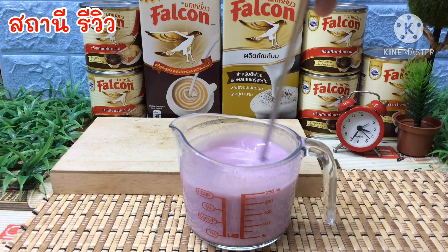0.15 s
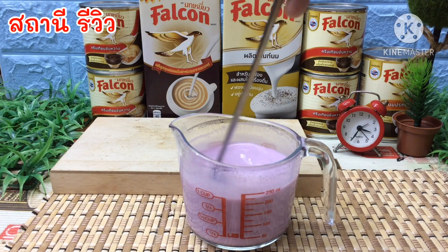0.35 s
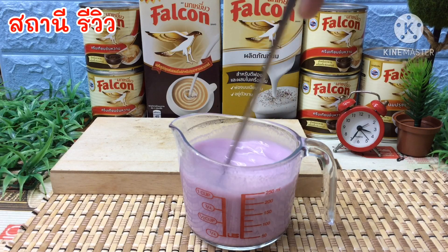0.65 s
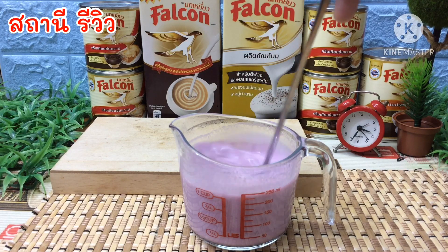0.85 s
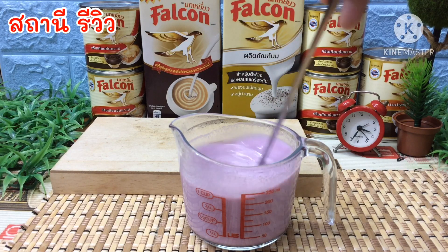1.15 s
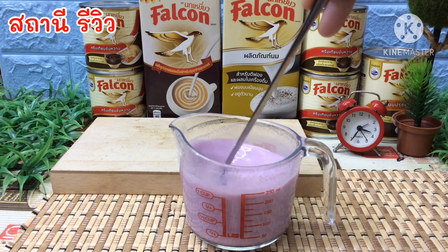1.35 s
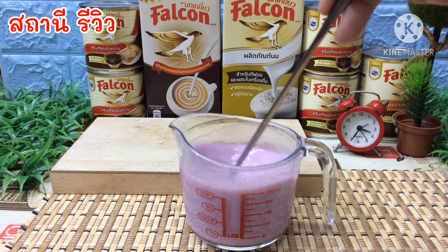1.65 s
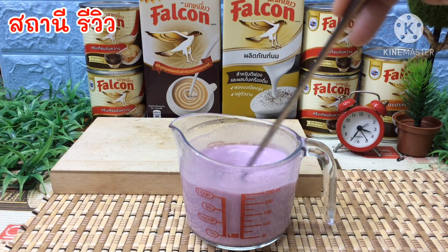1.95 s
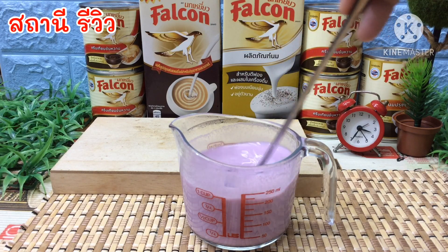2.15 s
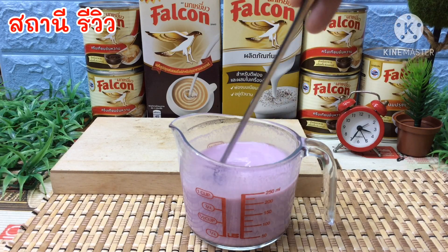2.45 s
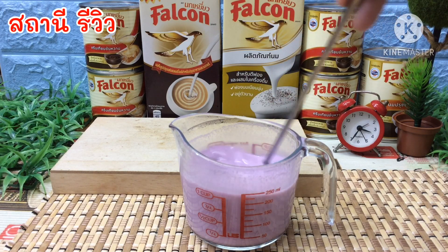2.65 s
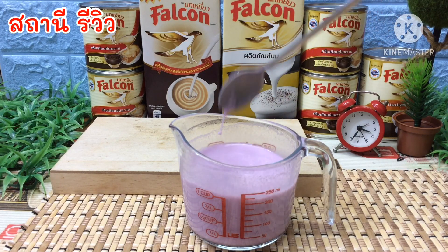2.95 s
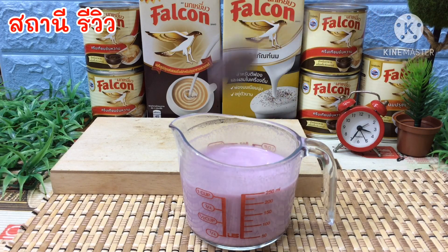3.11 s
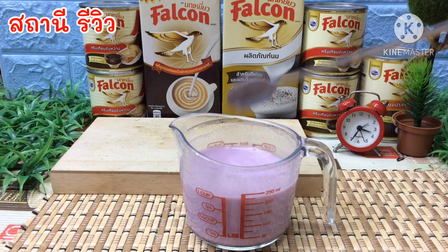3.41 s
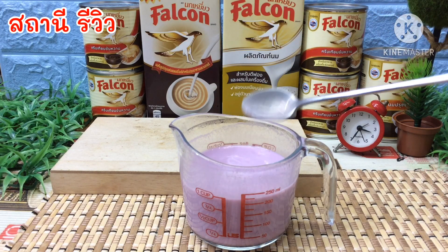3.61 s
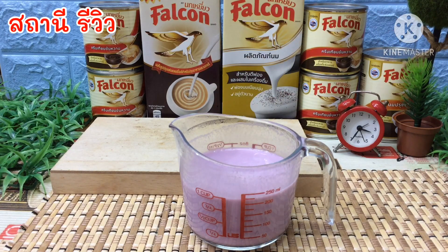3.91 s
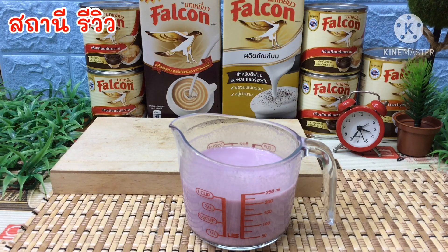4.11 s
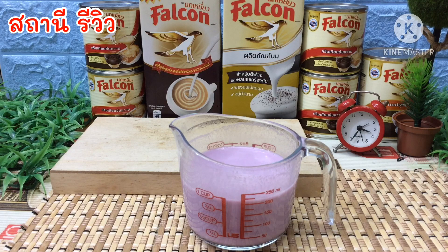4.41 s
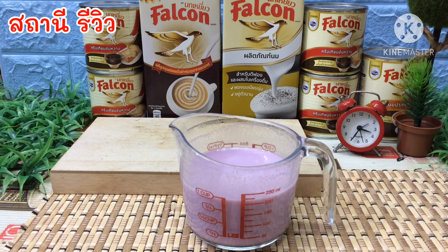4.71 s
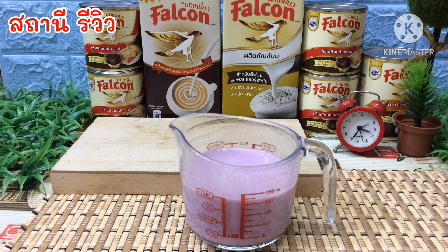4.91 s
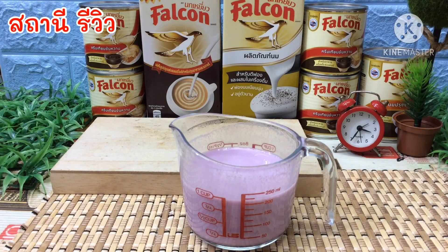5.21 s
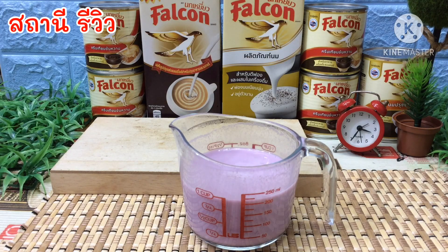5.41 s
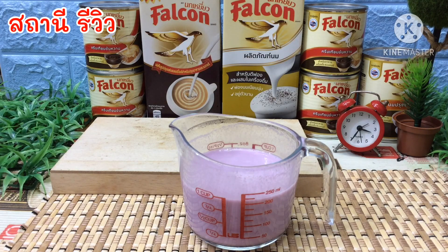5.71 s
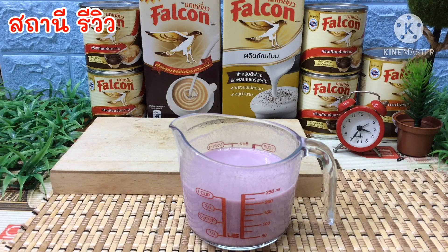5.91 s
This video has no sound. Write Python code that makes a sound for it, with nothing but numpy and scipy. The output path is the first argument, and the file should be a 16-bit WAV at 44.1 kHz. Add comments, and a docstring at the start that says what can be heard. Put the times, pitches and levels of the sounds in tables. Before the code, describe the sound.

From the start, a steel spoon stirs a thick drink in a glass jug close to the microphone, circling about three times a second. Each turn gives a gritty rub that rises and falls in pitch, and bright, briefly ringing clinks come thickly until about 1.1 seconds. The stirring then turns much softer, with light touches and tiny bubble pops. A few clearer clinks return around 2.4 seconds, and the stirring ends by 2.8. A very faint, dull slide follows around 3.4 seconds. At 4.7 seconds something is put down with a hard knock, the loudest sound, briefly ringing the woody counter. Things shift softly, and a second, lighter knock lands at 5.5 seconds, with a few faint drips and ticks up to the end at about 6 seconds. Quiet kitchen hiss, low rumble and electrical hum continue throughout.

```python
"""Stirring a drink in a glass jug

A steel spoon circles a thick jug of milky drink about three times a second, close to the microphone.
Friction and impacts excite the glass wall, whose pitch arches with each turn as the drink loads it.
The spoon is lifted out, things shift softly, and two are put down with hard knocks that ring the
kitchen counter. Faint bubbles and drips sound over hiss, low rumble and mains hum."""
import sys
import numpy as np
from scipy import signal
from scipy.fft import rfft, irfft, next_fast_len
from scipy.io import wavfile
from scipy.ndimage import uniform_filter1d

SR = 44100
rng = np.random.default_rng(int(sys.argv[2]) if len(sys.argv) > 2 else 0)


def bounce(signal):
    """Save signal as a 16-bit WAV file at the path given by the first command-line argument."""
    frames = np.transpose(np.atleast_2d(signal))
    limited = np.clip(frames, -1, 1)
    pcm = np.round(limited * 32767).astype(np.int16)
    wavfile.write(sys.argv[1], SR, pcm)


N = 267150
RING_SIZE = 12288  # samples in one impact
TIME_S, AGE_S = np.arange(N) / SR, np.arange(RING_SIZE) / SR
BINS_HZ = np.fft.rfftfreq(RING_SIZE, 1 / SR)

# spectra of the kitchen's hiss and rumble: frequency_hz, gain_db
HISS_SPECTRUM = [(40, -3), (70, -2), (110, -7.5), (145, -6), (180, -13), (330, -15.5), (560, -21.5),
                 (900, -22.5), (1500, -29), (3000, -33), (7000, -36.5), (15500, -38)]
RUMBLE_SPECTRUM = [(3, -3), (12, 6.5), (34, 5.5), (44, -7), (60, -13.5), (75, -15), (120, -59.5),
                   (300, -84.5)]
# partials of the hum: pitch_hz, level_db
HUM_PARTIALS = [(49.3, -41.5), (99, -61), (141, -64)]
# reverberation of the room: frequency_hz, t60_s
ROOM_DECAY = [(130, 0.2), (500, 0.26), (1500, 0.21), (4000, 0.18), (8000, 0.22), (15000, 0.15)]
# turns of the spoon: start_s, fastest_s, end_s, rub_db, lower_peak_hz, upper_peak_hz, grit_db
SPOON_TURNS = [(-.14, -0.025, 0.12, -42, 1173, 1570, -51.5), (.255, 0.293, 0.43, -39.5, 1195, 1580, -62),
               (0.411, .58, 0.767, -44.5, 1087, 1580, -54), (0.796, 0.93, 1.14, -44.5, 1078, 1670, -56.5),
               (1.147, 1.24, 1.41, -49, 1110, 1690, -63), (1.41, 1.557, 1.785, -52, 1150, 1663, -61),
               (1.79, 1.886, 2.073, -55, 1158, 1680, -65.5), (2.132, 2.208, 2.48, -53.5, 1104, 1516, -68),
               (2.524, 2.694, 2.77, -44, 1082, 1506, -49)]
# spectrum of the gritty scrape: frequency_hz, gain_db
GRIT_SPECTRUM = [(500, -32), (900, -8), (1500, -7), (1950, 6.5), (2350, 10.5), (2800, -1), (3400, 2),
                 (4600, -7), (6300, -15), (7000, -7), (7600, -21), (15000, -24)]
# spoon on glass: start_s, click_db, ring_db, pitch_hz, sag_per_s, pressure (0 rebounds, 1 stays on)
SPOON_IMPACTS = [(0.1249,-32,-31,1339,0.27,0.093), (0.255,-28,-19,1267,1.8,0.11),
                 (0.4223,-25.5,-22,1235,0.38,0.081), (0.4813,-47,-40.5,1218,0.72,1),
                 (0.5143,-43,-32.5,1260,0.13,0.18), (0.593,-34,-32,1407,-0.11,.1),
                 (0.7842,-25,-26.5,1251,1.23,0.041), (0.8233,-38.5,-25,1263,1.45,0.13),
                 (0.8427,-34.5,-29,1246,1.75,0.4), (1.008,-69,-40.5,1062,-0.91,0.76),
                 (1.068,-64,-48.5,1390,0,1), (1.1093,-27.5,-23,1347,.3,0.043),
                 (1.2849,-71,-46,1127,1.1,0.51), (1.333,-62,-47.5,1112,.5,0.3),
                 (1.4268,-66,-51.5,1424,0,0.56), (1.587,-74,-51,1176,-0.66,0.29),
                 (1.805,-73,-53.5,1256,0,0.44), (2.255,-77,-50.5,1450,0.37,1),
                 (2.3358,-64,-43.5,1257,0.64,0.98), (2.4418,-34.5,-24.5,1310,-0.11,0.85),
                 (2.453,-35.5,-45,1337,0.3,0.63), (2.485,-37,-27,1354,-0.46,1),
                 (2.5704,-53.5,-41,1370,-0.42,.6), (2.721,-40.5,-38.5,1365,0.65,0.14)]
# spectra of a clink's click, treble and thud: frequency_hz, gain_db
CLICK_SPECTRUM = [(400, -41), (750, -9), (1000, -3.5), (1350, 0), (1900, 2), (2200, 2.5), (2550, 0),
                  (3000, 2.5), (4200, -3.5), (5600, -8.5), (6900, -14), (8000, -22.5), (12000, -29)]
TREBLE_SPECTRUM = [(3000, -32), (6000, 6.5), (7200, 8.5), (9000, 4.5), (12500, 4), (15500, -10)]
THUD_SPECTRUM = [(60, -22), (120, 0), (150, -7.5), (170, -11), (195, -12.5), (232, -7.5), (350, -19),
                 (480, -11.5), (700, -17), (1200, -11), (3000, -51)]
# bending modes of the filled jug, before contact pressure alters them: pitch_hz, gain_db, t60_s
JUG_MODES = [(960, -15, .1), (1105, -11, .13), (1218, -3, .19), (1340, -4, .14), (1405, 0, .18),
             (1534, -6, .14), (1590, -12, .15), (1713, -2, .14)]
# high modes of the glass, the spoon's bowl, and the bowl clear of the drink: pitch_hz, gain_db, t60_s
HIGH_GLASS_MODES = [(2129, 0, .13), (2312, -2, .15), (2417, -2, .14), (2758, -1, .14), (2933, 0, .13),
                    (3049, -3, .13), (3378, -2, .14), (3550, -4, .14), (3975, -6, .14), (4209, -8, .15)]
SPOON_MODES = [(6115, -6, .1), (6589, -3, .1), (6880, -1, .1), (6925, 0, .12), (7050, -4, .1),
               (8680, -6, .08)]
LIFTED_SPOON_MODES = [(7030, -6, 0.18), (5070, -3, 0.14)]
# bubbles, drips and ticks: start_s, level_db, centre_hz, width_octaves, t60_s
SMALL_POPS = [(0.516, -44, 4000, 0.19, 0.19), (1.372, -67, 7100, 0.5, .05), (1.69, -61, 3040, 0.11, 0.076),
              (1.861, -68.5, 10700, .4, .02), (2.021, -63.5, 5100, 0.14, .18),
              (2.986, -68.5, 9900, 0.46, .015), (4.609, -59, 2495, .25, 0.019), (4.609, -67, 8370, .3, .03),
              (5.443, -63, 7960, 0.22, 0.025), (5.475, -64, 8020, 0.022, 0.17),
              (5.717, -65, 1660, 0.39, 0.02), (5.813, -55, 1463, 0.51, 0.018)]
# things sliding on the counter: middle_s, length_s, level_db, centre_hz, width_hz
SLIDES = [(3.398, 0.9, -61, 312, 217), (4.91, 0.084, -53, 590, 180.4), (5.155, 0.36, -61, 573, 108),
          (5.165, 0.44, -68, 993, 260), (5.09, 0.6, -59.5, 280, 199), (5.615, 0.058, -59, 1030, 397)]
# things put down, first edge then second, the counter's ring, and the thing's own mode:
# start_s, first_db, delay_s, second_db, ring_db, tilt_db_per_octave, own_hz, own_db
LANDINGS = [(4.7136, -16, .0046, -17, -15, -0.5, 1241, -21.5),
            (5.4744, -34.5, 0.012, -32, -24.5, -3, 2783, -31)]
# spectrum of a knock's crack: frequency_hz, gain_db
KNOCK_SPECTRUM = [(60, -21.5), (130, -7.5), (280, -9.5), (480, 3.5), (880, -5.5), (1100, 5.5), (1500, -1),
                  (2300, 1), (2900, 0.5), (4000, -6), (5500, -16.5), (8000, -26), (15000, -38)]
# modes of the counter: pitch_hz, gain_db, t60_s
COUNTER_MODES = [(128, -12, .22), (141, -12, .25), (166, -14, .25), (207, -11, .28), (312, -16, .25),
                 (353, -11, .27), (463, -4, .16), (489, -6, .2), (532, -5, .15), (589, -9, .22),
                 (624, -10, .22), (651, -12, .18), (799, -10, .16), (963, -12, .16), (1031, 2, .15),
                 (1114, -8, .17), (1351, -10, .15), (1448, -10, .15), (1628, -7, .16), (1739, -5, .13),
                 (1808, -6, .17), (2072, -8, .13), (2142, -9, .17), (2247, -8, .15), (2470, -8, .13),
                 (2605, -11, .15), (2726, -11, .16), (2836, -9, .15), (3246, -12, .16), (3359, -10, .15)]


def amp(db):
    """Amplitude grows tenfold for every 20 decibels."""
    return 10 ** (np.asarray(db) / 20)


def unit_rms(x):
    """Power normalisation: a steady sound is scaled to rms 1."""
    return x / np.sqrt(np.mean(x ** 2) + 1e-20)


def unit_blow(x):
    """Energy normalisation: a transient is given the energy of 30 ms at rms 1."""
    return x / np.sqrt(np.sum(x ** 2) / (.03 * SR) + 1e-20)


def curve(points, hz=BINS_HZ):
    """Interpolation of (frequency_hz, value) points on a logarithmic frequency axis."""
    point_hz, value = np.transpose(points)
    return np.interp(np.log(hz + 1), np.log(point_hz + 1), value)


def add(mix, start_s, sound):
    """Superposition: a sound adds to the mix from start_s on."""
    part = mix[max(round(start_s * SR), 0):][:len(sound)]
    part += sound[:len(part)]


def coloured(x, spectrum):
    """Spectral shaping: a long sound is weighted by frequency, then scaled to rms 1."""
    size = next_fast_len(N)
    gain = amp(curve(spectrum, np.fft.rfftfreq(size, 1 / SR)))
    return unit_rms(irfft(rfft(x, size) * gain, size)[:N])


def drift(per_s):
    """Random modulation: straight lines join Gaussian values, per_s of them a second."""
    knots = rng.standard_normal(1000)
    return np.interp(TIME_S * per_s, np.arange(len(knots)), knots)


def resonate(x, hz, width_hz):
    """Forced resonance: two equal resonators in series follow a pitch; the result has rms 1."""
    carrier = np.exp(2j * np.pi * np.cumsum(hz * np.ones(N)) / SR)
    pole = np.exp(-np.pi * width_hz / SR)
    for _ in range(2):
        x = 2 * (carrier * signal.lfilter([1 - pole], [1, -pole], x / carrier)).real
    return unit_rms(x)


def reflections(x, wet_db, t60_s):
    """Early reflection: the counter and things on it add sparse echoes to the direct sound."""
    taps = rng.standard_normal(RING_SIZE) * (rng.random(RING_SIZE) < 1500 / SR)
    taps *= amp(-60 * AGE_S / t60_s) * (AGE_S > .002)
    return x + amp(wet_db) * signal.oaconvolve(x, taps / np.linalg.norm(taps))[:N]


def crack(colour_db, t60_s, room_db):
    """Impulsive excitation: a brief contact gives a broadband burst and a reverberant tail."""
    burst, echoes = rng.standard_normal((2, RING_SIZE))
    hz, age_s, bands = signal.stft(echoes, SR, nperseg=256)
    bands *= amp(-60 * age_s / curve(ROOM_DECAY, hz)[:, None])
    tail = signal.istft(bands, SR, nperseg=256)[1][:RING_SIZE]
    spectrum = rfft(unit_blow(burst * amp(-60 * AGE_S / t60_s)) + amp(room_db) * unit_blow(tail))
    # flatten, then colour with minimum phase, so that nothing sounds before the blow
    magnitude = np.sqrt(uniform_filter1d(abs(spectrum) ** 2, size=44))
    log_gain = np.log(amp(np.maximum(colour_db, -80)) / magnitude)
    phase = -signal.hilbert(np.r_[log_gain, log_gain[-2:0:-1]]).imag[:len(BINS_HZ)]
    fade = np.minimum(1, 2 - 2 * AGE_S / AGE_S[-1]) ** 2
    return unit_blow(irfft(spectrum * np.exp(log_gain + 1j * phase)) * fade)


def ring(modes, uneven_db=0, t60_factor=1, sag_per_s=0):
    """Free vibration: damped modes sum, with weights that vary with the point of contact."""
    clock_s = AGE_S - sag_per_s * AGE_S ** 2 / 2  # sag is the share of pitch lost; negative rises
    out = np.zeros(RING_SIZE)
    for k, (hz, db, t60_s) in enumerate(modes):
        envelope = amp(db + uneven_db * rng.uniform(-0.87, 1) - 60 * AGE_S / (t60_s * t60_factor))
        out += (-1) ** k * envelope * np.sin(2 * np.pi * hz * clock_s)  # neighbours start opposed
    return unit_blow(out)


def kitchen():
    """Background noise: broadband hiss and rumble lie under the wavering partials of mains hum."""
    hiss = amp(-52.5) * coloured(rng.standard_normal(N), HISS_SPECTRUM) * amp(0.18 * drift(6.6))
    rumble = amp(-38.5) * coloured(rng.standard_normal(N), RUMBLE_SPECTRUM)
    hum = sum(amp(db + 1.2 * drift(3.245)) * np.sin(2 * np.pi * hz * TIME_S + .3 * drift(2.5))
              for hz, db in HUM_PARTIALS)
    return hiss + rumble + hum


def turning():
    """Mass loading: between turns the drink climbs the glass and lowers its modes as the rubbing fades."""
    rub, grit = np.zeros((2, N))
    lower_hz, upper_hz = np.full((2, N), 1000.)
    for start_s, fastest_s, end_s, rub_db, lower_peak_hz, upper_peak_hz, grit_db in SPOON_TURNS:
        now = (TIME_S >= start_s) & (TIME_S < end_s)
        progress = np.interp(TIME_S[now], [start_s, fastest_s, end_s], [0, .5, 1])
        slowness = 1 - np.sin(np.pi * progress)
        rub[now] = amp(rub_db - 15 * slowness)
        grit[now] = amp(grit_db - 32 * slowness)
        lower_hz[now] = lower_peak_hz * (1 - 0.18 * slowness)
        upper_hz[now] = upper_peak_hz * (1 - 0.2 * slowness)
    return rub, grit, lower_hz, upper_hz


def stirring():
    """Stick-slip friction: tiny slips of steel drive the wall's modes, which the swirling drink bends."""
    rub, grit, lower_hz, upper_hz = turning()
    slosh = 1 + .025 * drift(22)
    slips = rng.standard_normal(N) * (rng.random(N) < 1800 / SR) * amp(4 * drift(60))
    wall = (resonate(slips, lower_hz * slosh, width_hz=125)
            + amp(-1) * resonate(slips, upper_hz * np.sqrt(slosh), width_hz=135)
            + amp(-5) * resonate(slips, 1410, width_hz=110)
            + amp(-4) * resonate(slips, 1200, width_hz=600))
    scrape = amp(-0.5) * rub * unit_rms(wall) + amp(-1.5) * grit * coloured(slips, GRIT_SPECTRUM)
    return reflections(scrape, wet_db=-5, t60_s=0.092)


def clinks():
    """Impact excitation: each touch clicks, thuds through the base and rings both glass and spoon."""
    lift_s = 2.4
    contact, ringing = np.zeros((2, N))
    for start_s, click_db, ring_db, wall_hz, sag_per_s, pressure in SPOON_IMPACTS:
        # a pressed spoon damps the wall, favours its lower modes and loses treble
        t60_factor = np.interp(pressure, [0, 1], [1.27, 0.81])
        modes = [(hz, db - 15 * pressure * np.log2(hz / wall_hz), t60_s) for hz, db, t60_s in JUG_MODES]
        treble_db = click_db - 4.5 - 52 * pressure
        click = amp(click_db - 1.5) * crack(curve(CLICK_SPECTRUM), t60_s=0.034, room_db=-1.5)
        treble = amp(treble_db) * crack(curve(TREBLE_SPECTRUM), t60_s=0.035, room_db=-6)
        thud = amp(ring_db - 19.5) * crack(curve(THUD_SPECTRUM), t60_s=0.065, room_db=0)
        add(contact, start_s, click + treble + thud)
        chink = amp(click_db - 7) * ring(HIGH_GLASS_MODES, uneven_db=5)
        spoon = amp(click_db - 15.5) * ring(SPOON_MODES, uneven_db=7)
        if start_s > lift_s:  # clear of the drink, the bowl sings
            spoon += amp(click_db - 21) * ring(LIFTED_SPOON_MODES)
        jug = amp(ring_db - 7) * ring(modes, uneven_db=5, t60_factor=t60_factor)
        # the main mode glides as the drink moves on the wall
        wall = amp(ring_db - 4.5) * ring([(wall_hz, 0, .12)], t60_factor=t60_factor, sag_per_s=sag_per_s)
        add(ringing, start_s, chink + spoon + jug + wall)
    return contact + reflections(ringing, wet_db=-16, t60_s=0.11)


def pops():
    """Band-limited transients: each faint bubble, drip or tick dies away around its own frequency."""
    out = np.zeros(N)
    for start_s, db, hz, width_octaves, t60_s in SMALL_POPS:
        colour_db = -20 * np.log10(1 + (np.log2((BINS_HZ + 1) / hz) / width_octaves) ** 2)
        add(out, start_s, amp(db) * crack(colour_db, t60_s, room_db=-18))
    return out


def slides():
    """Sliding friction: things shifted on the counter give faint, dull swells of noise."""
    out = np.zeros(N)
    for middle_s, length_s, db, hz, width_hz in SLIDES:
        swell = np.cos(np.pi * np.clip((TIME_S - middle_s) / length_s, -.5, .5))
        out += amp(db) * swell * resonate(rng.standard_normal(N), hz, width_hz)
    return out


def knocks():
    """Modal response: a thing lands on one edge, then the other, ringing itself and the woody counter."""
    out = np.zeros(N)
    build_up = 1 - np.exp(-AGE_S / 0.0007)  # the slab takes a moment to get moving
    colour_db = curve(KNOCK_SPECTRUM)
    for start_s, first_db, delay_s, second_db, ring_db, tilt, own_hz, own_db in LANDINGS:
        # a softer landing reaches fewer of the high modes
        modes = [(hz, db + tilt * np.log2(max(hz / 500, 1)), t60_s) for hz, db, t60_s in COUNTER_MODES]
        add(out, start_s, amp(first_db) * crack(colour_db, t60_s=0.033, room_db=-6))
        add(out, start_s + delay_s, amp(second_db) * crack(colour_db, t60_s=0.036, room_db=-0.5))
        add(out, start_s, amp(ring_db) * build_up * ring(modes, uneven_db=3))
        add(out, start_s, amp(own_db) * ring([(own_hz, 0, .1)]))
    return out


def scene():
    """Superposition: the pressures of all sources add at one microphone."""
    return (kitchen() + stirring() + clinks() + pops() + slides() + knocks())[None]


def record(dry):
    """Clipping and band limiting: peaks stop at full scale, then a low-pass cuts above 16 kHz."""
    low_pass = signal.firwin(511, 16000, window=("kaiser", 9), fs=SR)
    return signal.oaconvolve(np.clip(dry, -1, 1), low_pass[None], "same")


dry = scene()
out = record(dry)
bounce(out)
```